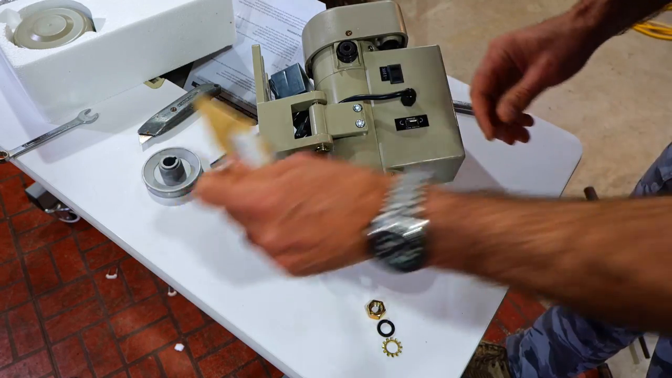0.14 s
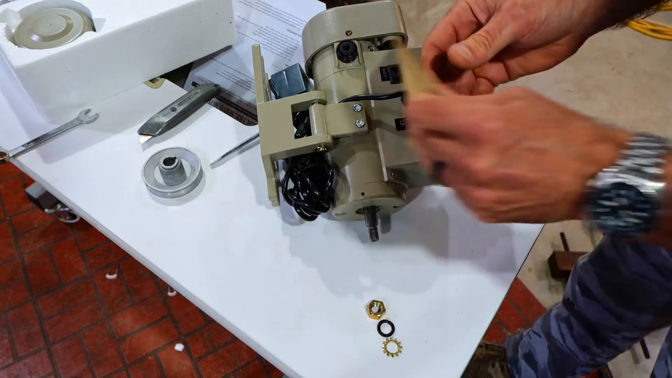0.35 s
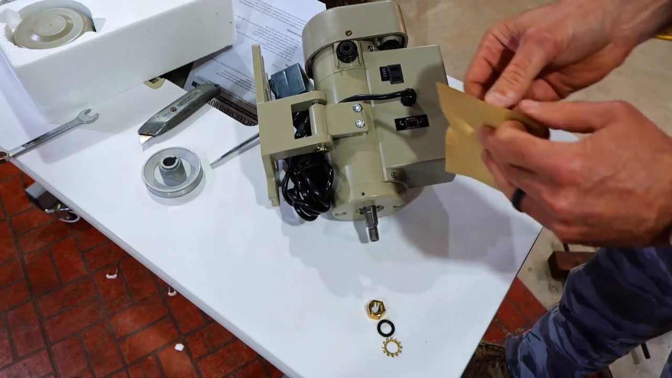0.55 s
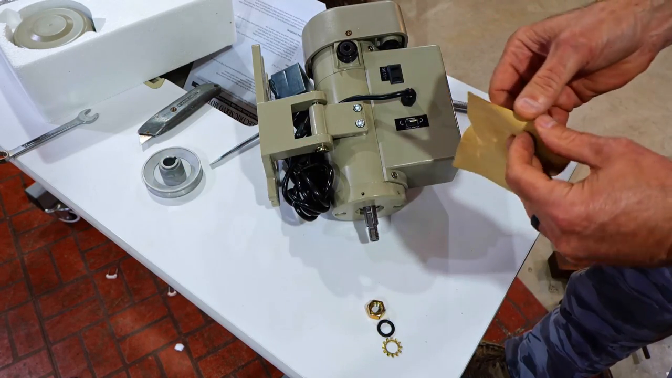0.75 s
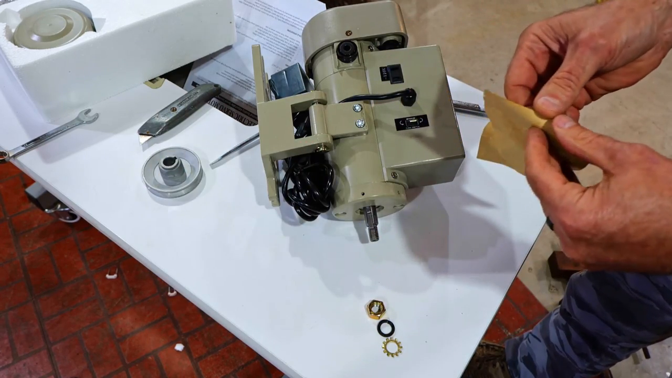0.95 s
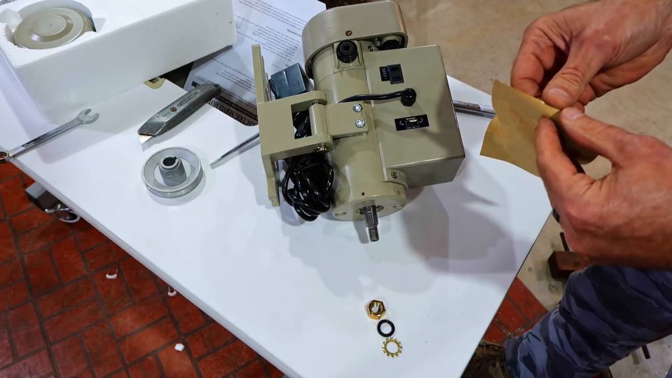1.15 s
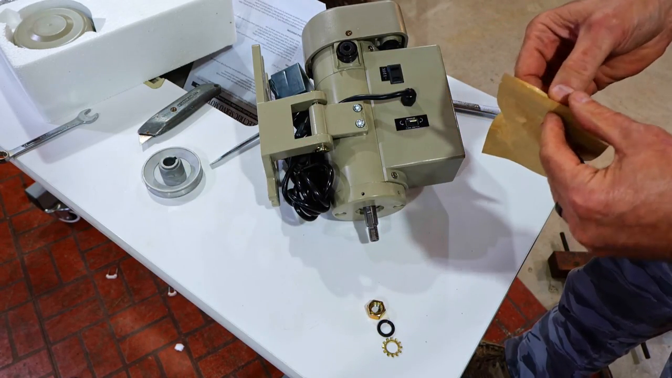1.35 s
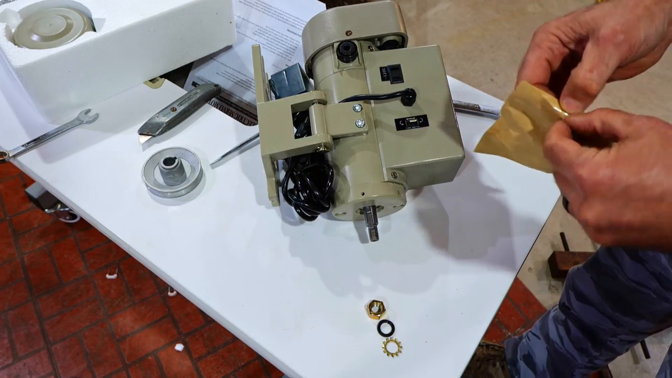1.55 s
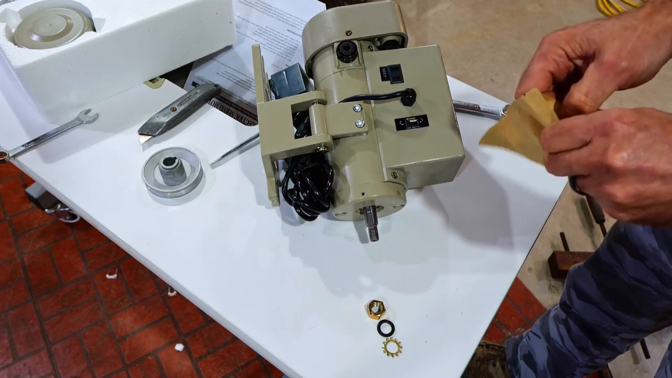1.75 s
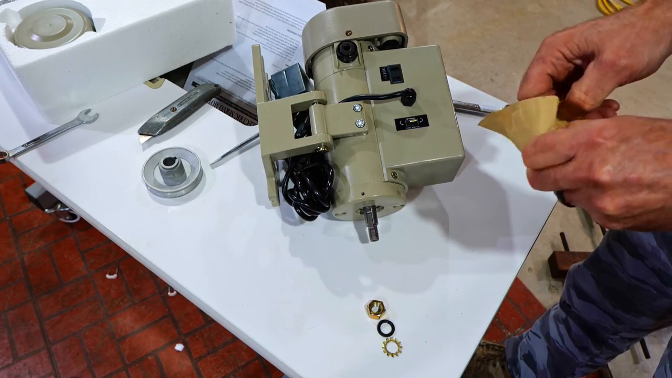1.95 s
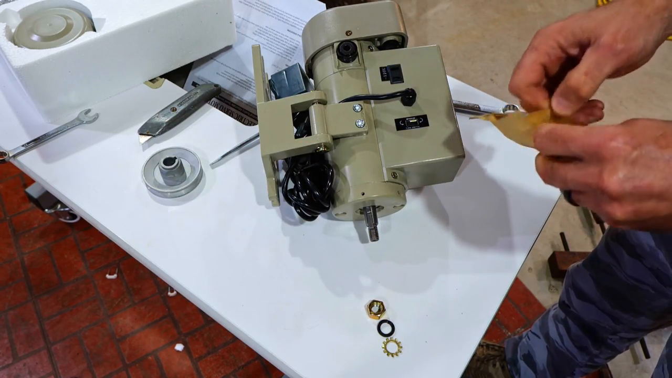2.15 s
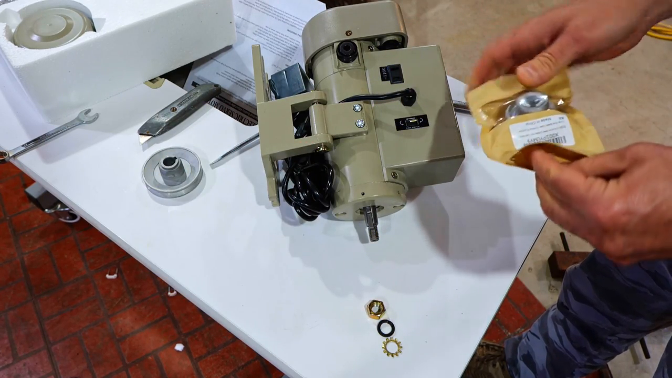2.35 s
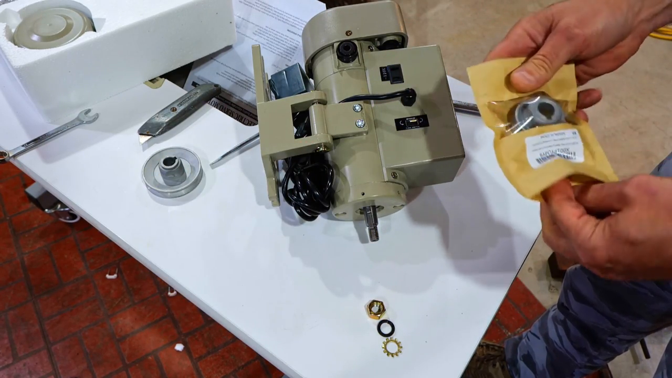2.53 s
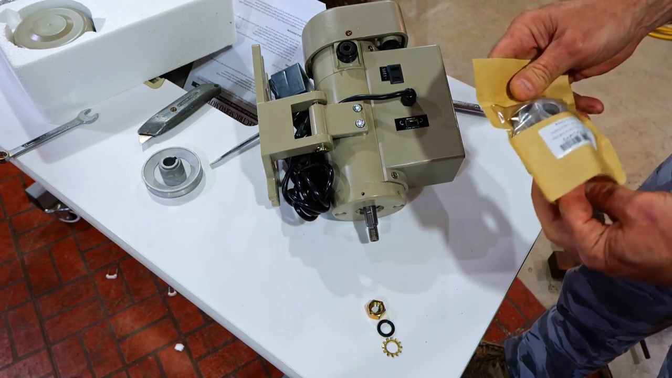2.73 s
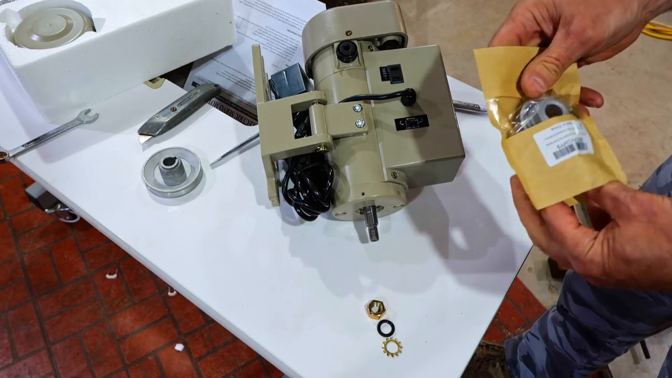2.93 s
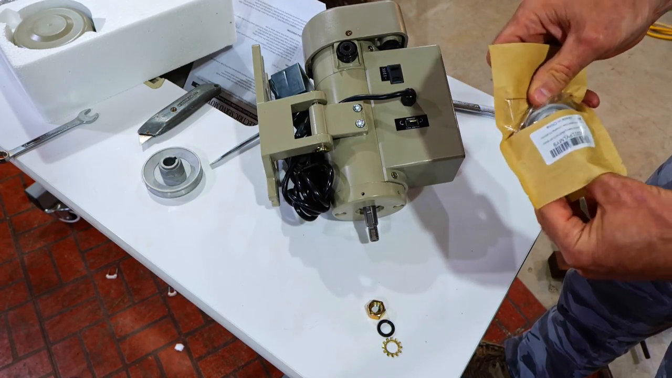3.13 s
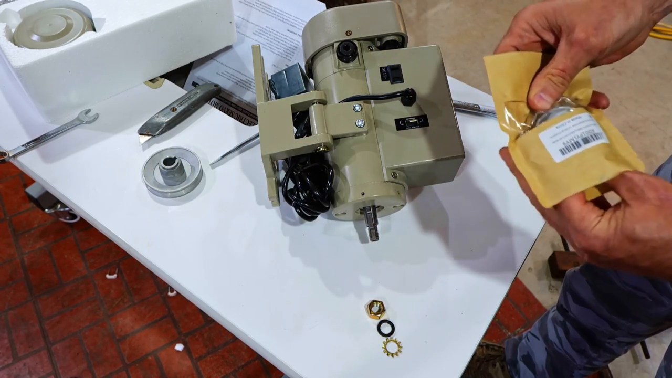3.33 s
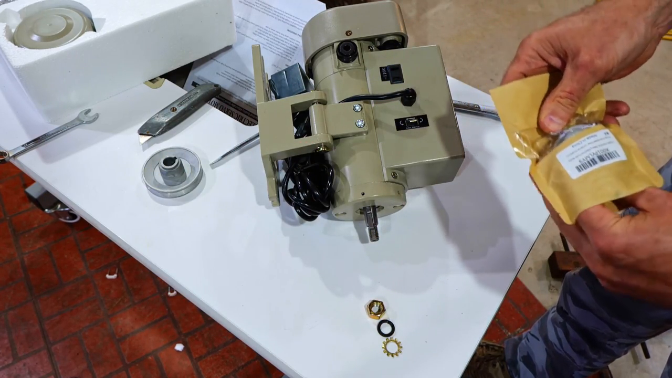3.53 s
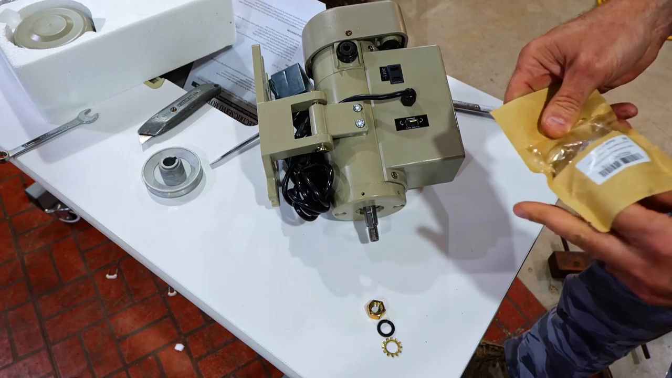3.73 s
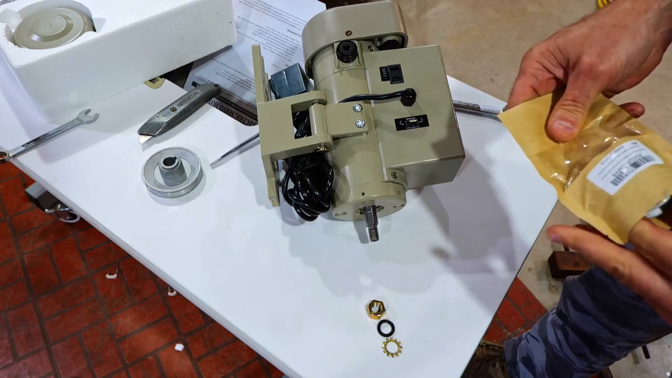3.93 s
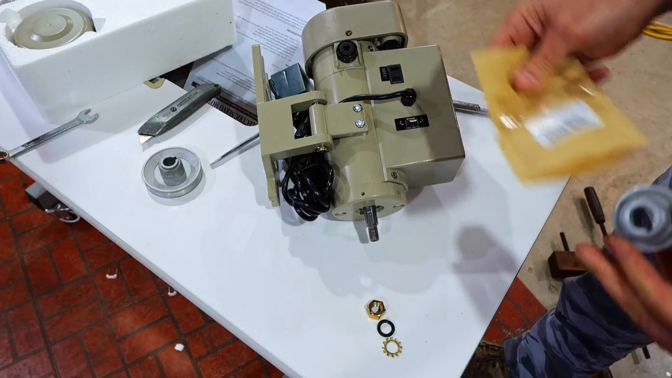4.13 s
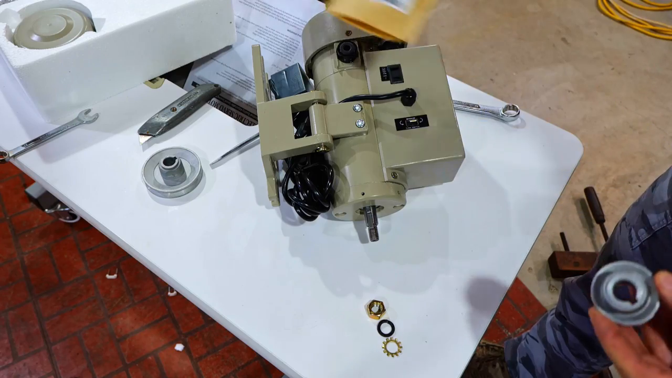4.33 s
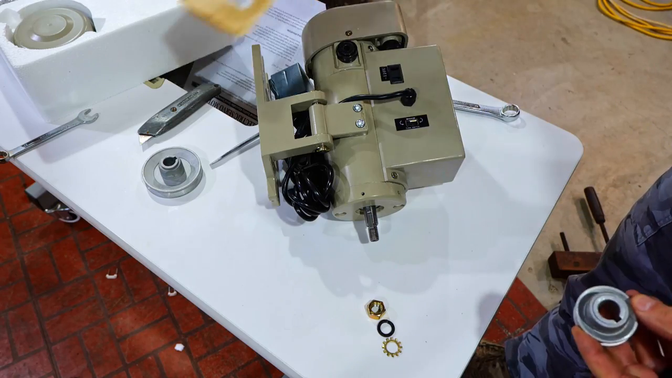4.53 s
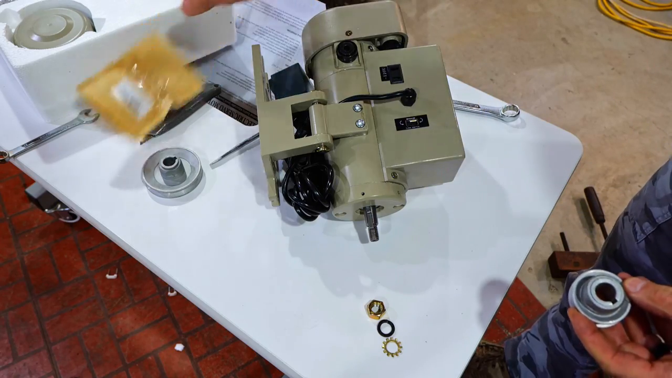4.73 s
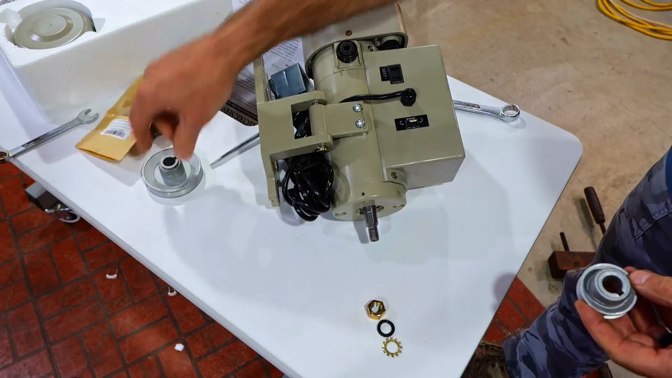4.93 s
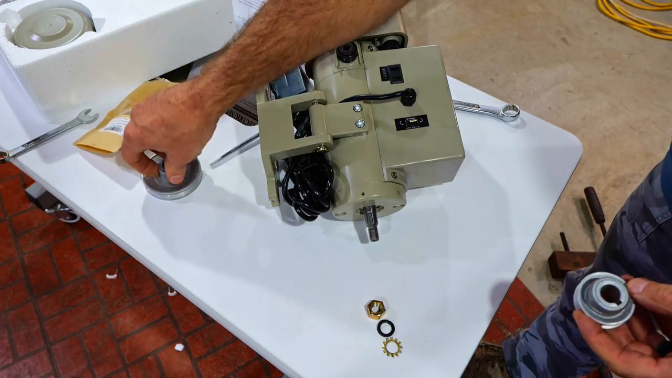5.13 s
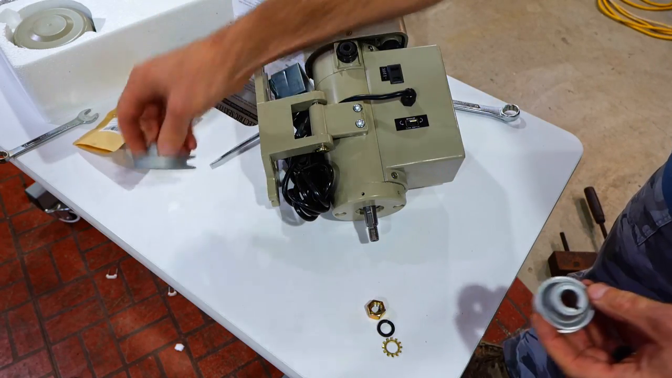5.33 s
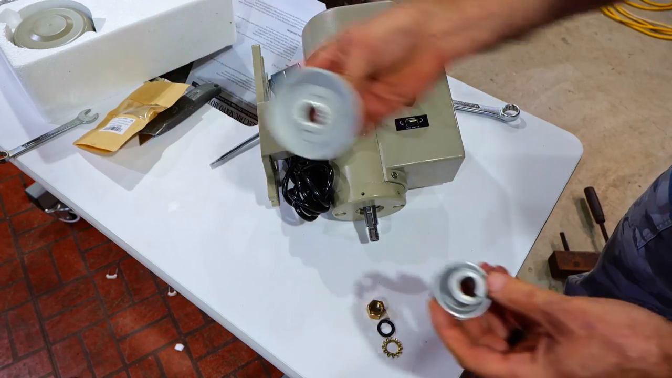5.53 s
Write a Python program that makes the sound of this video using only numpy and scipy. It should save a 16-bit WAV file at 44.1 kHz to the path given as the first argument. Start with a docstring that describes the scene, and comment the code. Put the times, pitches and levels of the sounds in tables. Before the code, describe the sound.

A small paper bag is handled near the microphone in a quiet, slightly echoing workshop. Scattered crinkles and finger rubbing build into loud, snapping tears, then steady crumpling with a few dull thumps. The bag drops onto a table. Right after, a metal pulley is dragged in short jerks and picked up, leaving a light, high ring.

```python
"""Paper bag and pulley in a workshop

Hands tear open and squeeze a small stiff paper bag close by, then drop it on a table. Creases snap in
bursts a few milliseconds long and fingers rub the sheet between them. At the end a metal pulley is
dragged off the table top and rings. The room answers softly; the sound is almost mono."""
import sys
import numpy as np
from scipy import signal
from scipy.fft import rfft, irfft, next_fast_len
from scipy.io import wavfile
from scipy.ndimage import uniform_filter1d

SR = 44100
rng = np.random.default_rng(int(sys.argv[2]) if len(sys.argv) > 2 else 0)


def output_pcm(signal):
    """Save a mono or channel-first signal as 16-bit PCM at the path in sys.argv[1].

    Samples are clipped to [-1, 1] before scaling.
    """
    pcm = np.clip(np.atleast_2d(signal).T, -1, 1) * 32767
    wavfile.write(sys.argv[1], SR, np.round(pcm).astype(np.int16))


N = 245838
TIME_S = np.arange(N) / SR


def undb(db):
    return 10 ** (np.asarray(db, float) / 20)


def envelope(start_s, hold_s, level_db, attack_s, fade_db_per_s):
    """Linear attack, hold, then a steady fall in dB; summed over events."""
    t = TIME_S - start_s[:, None]
    rise = np.clip(t / attack_s, 0, 1)
    fall_db = fade_db_per_s * np.clip(t - hold_s[:, None], 0, 1)
    return np.sum(rise * undb(level_db[:, None] - fall_db), axis=0)


def ring(x, pitch_hz, width_hz, order=1):
    """Causal resonance along the last axis; pitch_hz may hold one value per row."""
    size = next_fast_len(x.shape[-1] + SR // 4) if x.ndim == 1 else x.shape[-1]
    hz = np.fft.rfftfreq(size, 1 / SR) + 1e-3
    detuning = (hz - pitch_hz ** 2 / hz) / width_hz
    return irfft(rfft(x, size) / (1 + 1j * detuning) ** order, size)[..., :x.shape[-1]]


def resonate(x, modes):
    """Steep resonances summed with alternating sign, rms 1."""
    y = sum((-1) ** k * undb(gain_db) * ring(x, pitch_hz, width_hz, order=2)
            for k, (pitch_hz, width_hz, gain_db) in enumerate(modes))
    return y / np.std(y)


def slips(rate_per_s, spread_db):
    """Sparse friction impulses of uneven size, rms 1."""
    x = (rng.random(N) < rate_per_s / SR) * rng.standard_normal(N)
    x *= undb(spread_db * rng.exponential(size=N))
    return x / np.std(x)


# Room noise spectrum: frequency_hz, density_db
AIR_SPECTRUM = [(15, -45), (25, -4), (249, 2.5), (863, -9.5), (1020, -1.5), (1790, -9.5), (2220, -8.5),
                (8360, -13), (13600, -15), (16000, -24.5)]

def room_air(mid_db=-63.5, side_db=-73.5):
    """Steady background noise, as mid and side."""
    frequency_hz, density_db = np.transpose(AIR_SPECTRUM)
    hz = np.fft.rfftfreq(N, 1 / SR) + 1
    gain = undb(np.interp(np.log(hz), np.log(frequency_hz), density_db))
    noise = irfft(rfft(rng.standard_normal((2, N))) * gain, N)
    return noise / np.std(noise) * undb([[mid_db], [side_db]])


# Swells of the hum: start_s, hold_s, level_db
HUM_SWELLS = [(0.0, .08, -64), (0.284, .75, -59)]

def far_hum(pitch_hz=29):
    """A far, very low hum comes and goes."""
    swell = envelope(*np.transpose(HUM_SWELLS), attack_s=0.032, fade_db_per_s=123.5)
    return swell * np.sin(2 * np.pi * pitch_hz * TIME_S)


# Workshop reverberation: frequency_hz, t60_s, mid_db, side_re_mid_db
ROOM_DECAY = [(100, 0.4, 3, -12), (298, 0.56, -12, -29), (690, 0.61, -6, -22), (2000, 0.32, -15, -35),
              (6000, 0.35, -4.5, -14.5), (16000, 0.051, -9.5, -1.5)]

def room_echoes(sound, level_db=-13.5, gap_s=0.0021, early_db=-0.5, early_decay_s=0.034):
    """Echoes start after the nearest wall and die away by octave band, as mid and side."""
    t = np.arange(SR // 2) / SR
    frequency_hz, *columns = np.transpose(ROOM_DECAY)
    tail = 0
    for band_hz in 125 * 2. ** np.arange(8):
        t60_s, mid_db, side_db = (np.interp(np.log(band_hz), np.log(frequency_hz), c) for c in columns)
        band = ring(rng.standard_normal((2, len(t))), band_hz, 0.87 * band_hz)
        tail += band * undb(mid_db - 60 * t / t60_s) * undb([[0], [side_db]])
    tail *= np.clip(t / gap_s - 1, 0, 1)
    tail *= 1 + undb(early_db) * np.exp(-t / early_decay_s)  # first echoes off table top and machine
    tail *= undb(level_db) / np.sqrt(np.sum(tail[0] ** 2))
    return signal.fftconvolve(sound[None], tail, axes=1)[:, :N]


# Pulley modes, close pairs beat: pitch_hz, peak_db, t60_s
PULLEY_MODES = [(4373, -33, .9), (4391, -30, .9), (4450, -34, .08), (7195, -34, .06), (7228, -30, .08),
                (7258, -34, .12), (9750, -43, .1), (11190, -42, .1), (12120, -46, .12), (12480, -43, .08),
                (12960, -43, .12), (13600, -42, .15), (10600, -48, .08), (13200, -45, .1), (14300, -46, .1)]

def pulley_ring(push, lift_s=5.262, held_t60_s=0.027):
    """The metal hardly rings while pressed on the table and rings on once lifted."""
    lifted = TIME_S > lift_s
    width_times_t60 = np.log(1000) / np.pi
    out = np.zeros(N)
    for pitch_hz, peak_db, t60_s in PULLEY_MODES:
        free = ring(push * lifted, pitch_hz, width_times_t60 / t60_s)
        out += undb(peak_db) * free / np.abs(free).max()
    for pitch_hz, peak_db, _ in PULLEY_MODES[3:]:
        out += undb(peak_db + 53) * ring(push * ~lifted, pitch_hz, width_times_t60 / held_t60_s)
    return out


# Jerks of the pulley: start_s, slide_s, board_db, grit_re_board_db
DRAG_JERKS = [(5.061, 0.014, -40, -14), (5.11, 0.051, -34.5, -17.5), (5.245, 0.053, -28, -0.5)]
# Table top modes: pitch_hz, width_hz, gain_db
BOARD_MODES = [(345, 62, 3.5), (518, 234, 0.5), (822, 230, 3.5), (977, 400, 1), (1098, 450, 0)]
# Low table modes: pitch_hz, width_hz, gain_db
BOOM_MODES = [(154, 28, -1), (227, 28, 3.5)]

def pulley_drag(grit_attack_s=0.058, metal_re_grit_db=-6.5):
    """The rim chatters over the table top: the board booms, grit scrapes and the metal is driven."""
    start_s, slide_s, board_db, grit_re_board_db = np.transpose(DRAG_JERKS)
    grit_db = board_db + grit_re_board_db
    board_gain = envelope(start_s, slide_s, board_db, attack_s=0.014, fade_db_per_s=362)
    grit_gain = envelope(start_s, slide_s, grit_db, grit_attack_s, fade_db_per_s=400)
    metal_gain = envelope(start_s, slide_s, grit_db + metal_re_grit_db, grit_attack_s, fade_db_per_s=1200)
    chatter = slips(rate_per_s=2500, spread_db=0.71)
    push = metal_gain * rng.standard_normal(N)
    board = board_gain * resonate(chatter, BOARD_MODES)
    boom = undb(-70.5) * resonate(board_gain * chatter, BOOM_MODES)
    scrape = grit_gain * resonate(chatter, FRICTION_MODES)
    hiss = undb(-30) * ring(push, pitch_hz=10000, width_hz=9000)
    return board + boom + scrape + hiss + pulley_ring(push)


# Thumps under snaps: start_s, peak_db
LOW_THUMPS = [(1.793, -25), (1.846, -41), (2.06, -40), (2.377, -54), (3.028, -41), (3.762, -59.5),
              (3.908, -44), (4.115, -44), (4.821, -50)]

def low_thumps(half_length_s=0.00076):
    """Short one-sided pulses, heard as dull low thumps under some snaps."""
    start_s, peak_db = np.transpose(LOW_THUMPS)[:, :, None]
    centre_s = start_s + 2 * half_length_s
    return np.sum(undb(peak_db) * np.exp(-((TIME_S - centre_s) / half_length_s) ** 2), axis=0)


# Quick slides: centre_s, half_length_s, level_db, pitch_hz, width_hz
PAPER_STROKES = [(0.068, 0.022, -37.5, 2040, 3340), (0.209, 0.015, -53.5, 3000, 5000),
                 (0.627, 0.014, -47.5, 4000, 8000), (1.345, 0.016, -53, 5000, 9000),
                 (1.46, 0.059, -54, 2240, 1200), (2.051, 0.016, -49, 9000, 9000),
                 (2.299, 0.0064, -43.5, 6000, 9000), (2.378, 0.0047, -26, 1230, 1580),
                 (2.532, 0.014, -34, 2470, 6000), (3.357, 0.11, -57, 3000, 7000),
                 (4.116, 0.018, -23, 1300, 1840), (4.836, 0.0096, -33, 1500, 2500),
                 (5.038, 0.0013, -40, 11000, 8920)]

def paper_strokes():
    """A finger or the bag slides in a short swell of grainy friction."""
    friction = 0.22 * slips(rate_per_s=1500, spread_db=5.2) + rng.standard_normal(N)
    out = np.zeros(N)
    for centre_s, half_length_s, level_db, pitch_hz, width_hz in PAPER_STROKES:
        reach_s = 3 * half_length_s
        span = slice(max(int((centre_s - reach_s) * SR), 0), int((centre_s + reach_s) * SR))
        swell = np.exp(-((TIME_S[span] - centre_s) / half_length_s) ** 2)
        stroke = ring(friction[span], pitch_hz, width_hz, order=2)
        out[span] += undb(level_db) * swell * stroke / np.std(stroke)
    return out


# Fingers moving over the sheet: time_s, rub_db, hiss_re_rub_db
RUB_LEVELS = [(0.0, -48, -6), (.1, -52.5, 0), (.17, -65, -11), (.42, -66.5, 0.5), (.435, -40, -4.5),
              (.5, -49, -2.5), (.65, -56, 3), (.9, -53.5, 2), (1.0, -72, -20), (1.385, -95, -4),
              (1.41, -64, 2.5), (1.73, -57, 6), (1.8, -43, 2), (1.93, -39.5, -8), (2.05, -45, -11),
              (2.3, -51.5, 0), (2.5, -54, 7), (2.56, -38, -6), (2.9, -51, -9.5), (3.0, -36, -3.5),
              (3.18, -51, 1), (3.24, -79, 5), (3.3, -42.5, -6.5), (3.5, -57.5, 6), (3.72, -53.5, -6.5),
              (3.86, -41, 0.5), (3.98, -40.5, -2.5), (4.05, -43, -12), (4.2, -56, 16), (4.27, -56, -6),
              (4.38, -51, 3), (4.55, -80, 1), (4.81, -64.5, -15), (4.86, -39, -12), (5.05, -66, -7)]
# Hollow of the bag: pitch_hz, width_hz, gain_db
CAVITY_MODES = [(380, 450, -2.5), (850, 270, 3.5)]
# Friction bands of the sheet, also of the table grit: pitch_hz, width_hz, gain_db
FRICTION_MODES = [(1300, 1090, 16), (2100, 1000, 15.5), (3300, 1140, 10.5)]
# Paper hiss bands: pitch_hz, width_hz, gain_db
HISS_BANDS = [(5000, 7850, -2), (8300, 8700, -2.5), (12200, 10000, -7)]

def finger_rubbing(grip_step_s=0.022, grip_spread_db=3.5, hollow_db=-5):
    """Tiny slips of skin on paper and an uneven hiss excite the sheet and the hollow of the bag."""
    time_s, *levels_db = np.transpose(RUB_LEVELS)
    rub_gain, hiss_gain = (undb(np.interp(TIME_S, time_s, db, left=-120, right=-120)) for db in levels_db)
    step = int(grip_step_s * SR)
    grip_steps = np.repeat(rng.standard_normal(N // step + 1), step)[:N]
    grip = undb(grip_spread_db * uniform_filter1d(grip_steps, step // 2))
    ticks = grip * slips(rate_per_s=400, spread_db=1.7)
    smooth = grip * rng.standard_normal(N)
    hollow = undb(hollow_db) * resonate(2.6 * ticks + smooth, CAVITY_MODES)
    sheet = resonate(0.9 * ticks + smooth, FRICTION_MODES)
    hiss = hiss_gain * resonate(0.7 * ticks + smooth, HISS_BANDS)
    return rub_gain * (hollow + sheet + hiss)


# Snapping creases: start_s, level_db, panel_hz, body_re_level_db, edge_re_level_db
CREASE_SNAPS = [(0.067, -23, 560, -20, -18.5), (0.229, -35, 414, -11.5, -32), (0.312, -31, 350, -27, -19),
                (0.426, -21.5, 390, -13.5, -12.5), (0.491, -16, 2580, -21, -43),
                (0.806, -16, 1260, -21, -15.5), (0.817, -19, 660, -25, -18),
                (0.889, -17.5, 4700, -21.5, -14), (1.081, -44.5, 353, -22, -13),
                (1.197, -33, 3470, -21, -0.5), (1.408, -39.5, 1980, -21.5, -13),
                (1.504, -32.5, 1310, -22, -20), (1.69, -32, 3350, -28.5, -25.5),
                (1.751, -18, 2880, -19.5, -24), (1.76, -7, 2950, -32.5, -10.5),
                (1.795, 0.5, 3080, -35.5, -13), (1.847, -4, 2620, -26, -3), (1.852, -11, 1990, -21.5, -30),
                (1.87, -5, 1550, -29.5, -22), (1.884, -1.5, 3100, -39.5, -25),
                (1.895, -8.5, 3320, -22.5, -25), (1.901, 0, 1830, -32, -21.5),
                (1.971, -15, 1300, -23, -16.5), (2.006, -6, 1290, -46, -17),
                (2.06, -21.5, 1050, -25.5, -29), (2.094, -20, 3300, -32, -50), (2.146, -28, 1190, -40, -22),
                (2.155, -26, 926, -23, -14), (2.19, -11, 1390, -38, -75), (2.254, -23, 1220, -23.5, -17.5),
                (2.347, -25, 5000, -20.5, -13), (2.364, -18.5, 4130, -23, -21),
                (2.378, -11, 965, -11, -18.5), (2.417, -28.5, 4190, -12, -12.5),
                (2.47, -20, 4700, -32, -8.5), (2.528, -18, 462, -18, -19.5), (2.554, -5.5, 2250, -29, -15),
                (2.653, -32.5, 1750, -6.5, -23), (2.672, -15.5, 1300, -31, -50),
                (2.759, -9, 412, -18.5, -17.5), (2.772, -6, 1270, -27, -23.5), (2.836, -6, 2000, -25, -16),
                (2.916, -5.5, 1700, -22.5, -35.5), (2.985, -12, 3320, -22.5, -16.5),
                (3.028, -5, 2960, -28.5, -8.5), (3.067, -12, 820, -19.5, -31), (3.124, -8, 1380, -29, -28),
                (3.293, -27, 446, -21, -29), (3.308, -21.5, 1780, -20, -40),
                (3.332, -22.5, 496, -18, -15.5), (3.403, -20, 1940, -20.5, -24.5),
                (3.458, -10, 2000, -21.5, -11.5), (3.484, -9, 890, -19, -31),
                (3.526, -18, 1410, -17.5, -43), (3.611, -17.5, 1690, -18.5, -30),
                (3.646, -16, 2100, -41, -15.5), (3.716, -34, 1870, -23.5, -11.5),
                (3.732, -14, 1500, -33, -26), (3.754, -16, 2230, -20, -21), (3.762, -10, 1360, -25, -19),
                (3.771, -18, 2100, -16.5, -28), (3.814, -22.5, 2020, -26, -14), (3.851, -1, 1780, -43, -23),
                (3.893, -10, 2100, -30.5, -17), (3.908, -5, 1680, -30, -29), (3.925, -16, 2300, -16, -8),
                (3.935, -7, 2140, -27.5, -25.5), (3.96, -5, 1980, -29, -12), (4.061, -16, 2290, -11.5, -6),
                (4.076, -7.5, 530, -16.5, -23), (4.117, -5, 1840, -23.5, -16.5),
                (4.124, -9, 1570, -23.5, -21), (4.163, -22.5, 1550, -13, -8),
                (4.185, -7.5, 1730, -25.5, -18.5), (4.318, -12.5, 2450, -40, -36),
                (4.339, -15, 2440, -32, -18.5), (4.357, -19.5, 2100, -27, -33),
                (4.445, -11, 1650, -47, -37), (4.49, -28.5, 3000, -45, -6.5), (4.822, -6, 1140, -22, -17),
                (4.851, -12, 1070, -17, -15.5), (4.878, -14, 826, -13.5, -15)]

def crease_snaps(attack_s=0.00015, decay_s=0.0013, delay_s=0.0016, cutoff_hz=290, snap_samples=2048):
    """A crease gives way in a short tremor that rings the nearest panel, the bag and the paper edge."""
    start_s, level_db, panel_hz, body_db, edge_db = np.transpose(CREASE_SNAPS)[:, :, None]
    t = np.arange(snap_samples) / SR
    burst = (1 - np.exp(-t / attack_s)) * np.exp(-t / decay_s)
    tremor = burst * rng.standard_normal((len(start_s), snap_samples))
    low_cut = signal.butter(2, cutoff_hz, "high", fs=SR, output="sos")  # small panels radiate little bass
    panel = signal.sosfilt(low_cut, ring(tremor, panel_hz, width_hz=0.61 * panel_hz + 150, order=2))
    parts = [(panel, -6),
             (ring(tremor, pitch_hz=160, width_hz=140, order=2), body_db - 11.5),  # thud of the hand
             (ring(tremor, pitch_hz=450, width_hz=550, order=3), body_db + 5.5),
             (ring(tremor, pitch_hz=2740, width_hz=3600, order=2), edge_db + 6),
             (ring(tremor, pitch_hz=7570, width_hz=1500, order=2), edge_db + 1),
             (ring(tremor, pitch_hz=13200, width_hz=5700, order=2), edge_db - 3)]
    snaps = 0
    for part, part_db in parts:  # each carries the energy of 1 ms at its level
        energy_ms = np.sum(part ** 2, axis=1, keepdims=True) * 1000 / SR
        snaps += undb(level_db + part_db) * part / np.sqrt(energy_ms)
    out = np.zeros(N + snap_samples)
    for start, snap in zip(((start_s[:, 0] + delay_s) * SR).astype(int), snaps):
        out[start:start + snap_samples] += snap
    return out[:N]


def scene():
    """Bag and pulley in the centre, the room around them; left and right."""
    near = crease_snaps() + finger_rubbing() + paper_strokes() + pulley_drag()
    hum = far_hum()
    direct = np.array([near + low_thumps() + hum, 0.1 * hum])
    mid, side = direct + room_air() + room_echoes(near)
    return np.array([mid + side, mid - side])


def record(dry):
    """The loudest snaps clip at full scale, then the top is cut."""
    cutoff_hz = 15900
    low_pass = signal.ellip(9, 0.2, 85, cutoff_hz, fs=SR, output="sos")
    return signal.sosfilt(low_pass, np.clip(dry, -1, 1))


dry = scene()
out = record(dry)
output_pcm(out)
```